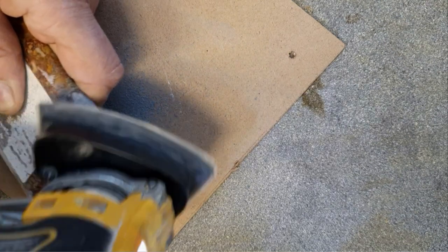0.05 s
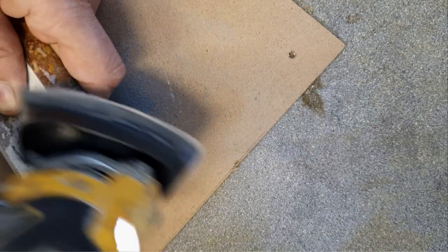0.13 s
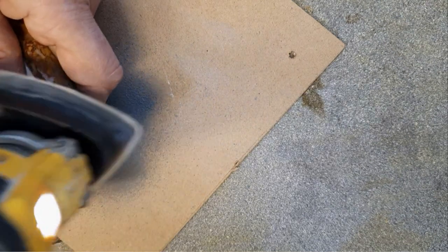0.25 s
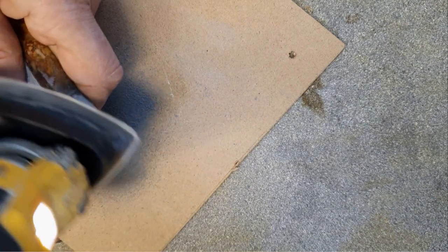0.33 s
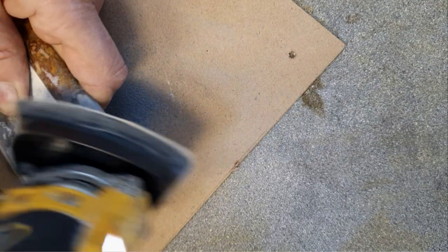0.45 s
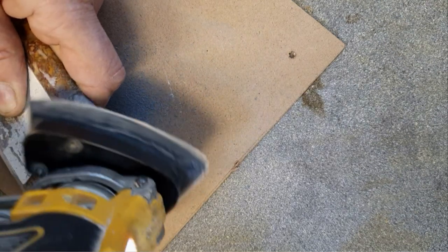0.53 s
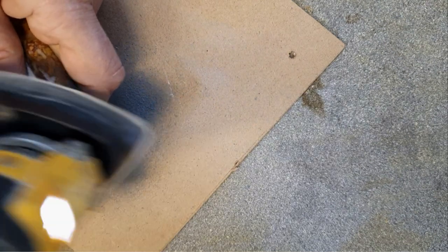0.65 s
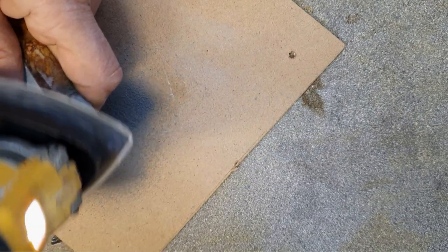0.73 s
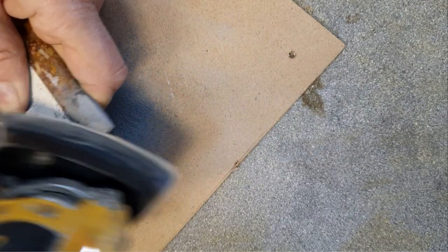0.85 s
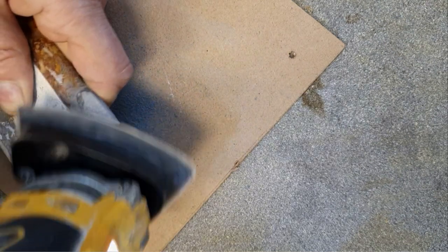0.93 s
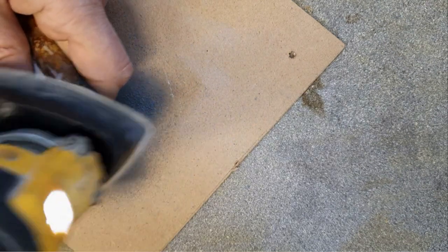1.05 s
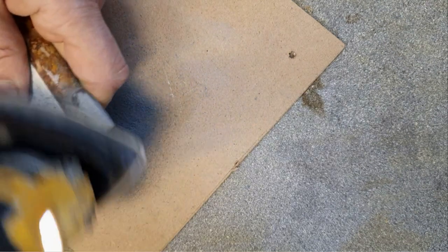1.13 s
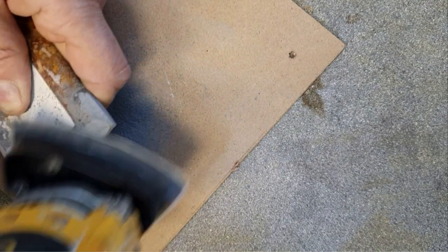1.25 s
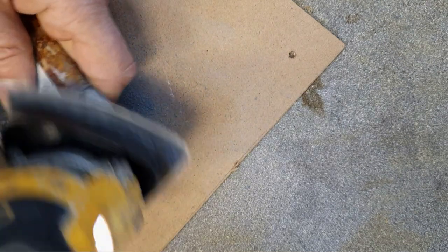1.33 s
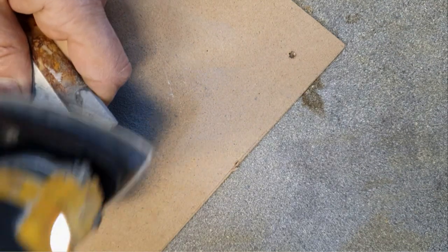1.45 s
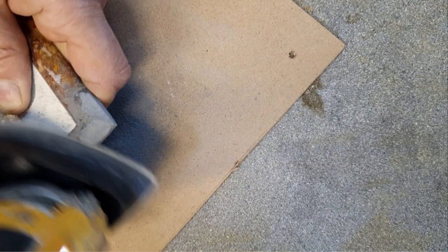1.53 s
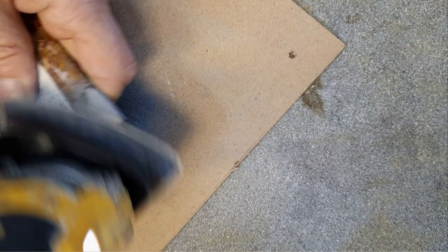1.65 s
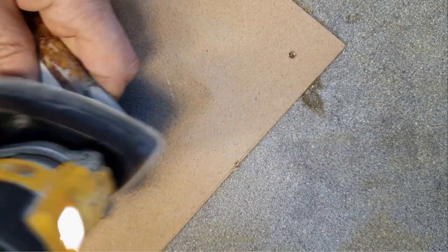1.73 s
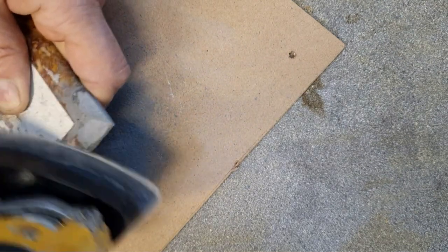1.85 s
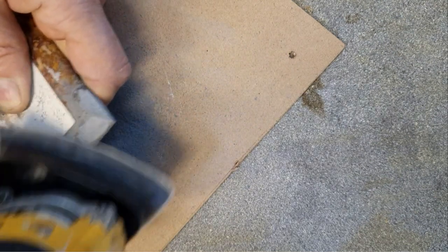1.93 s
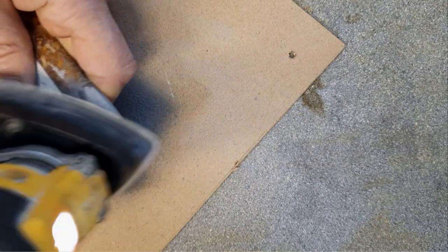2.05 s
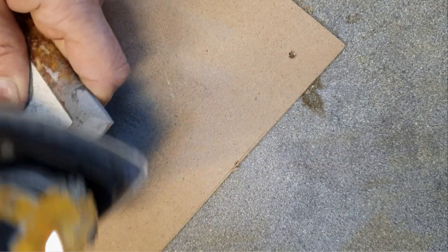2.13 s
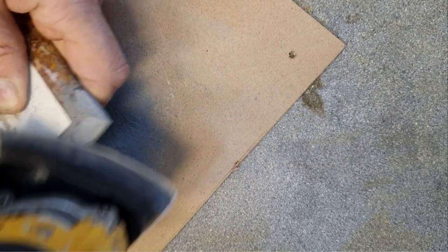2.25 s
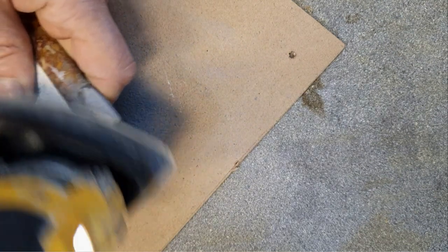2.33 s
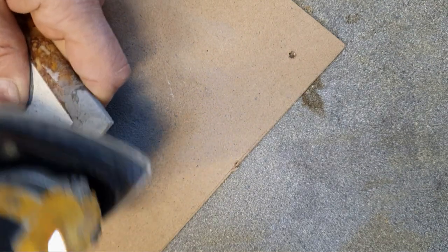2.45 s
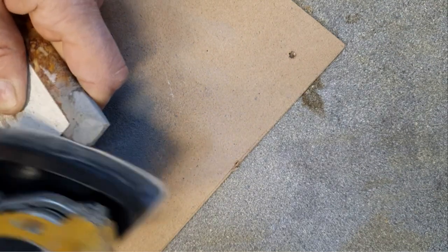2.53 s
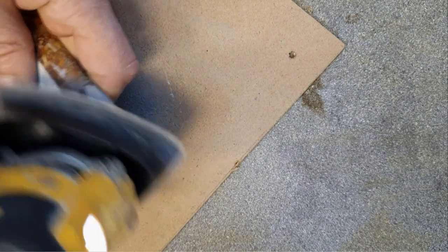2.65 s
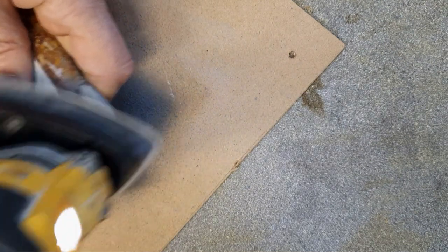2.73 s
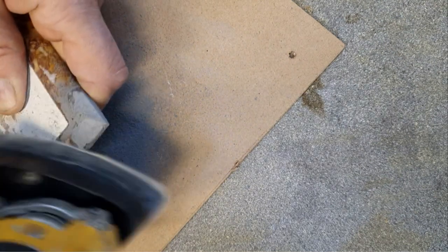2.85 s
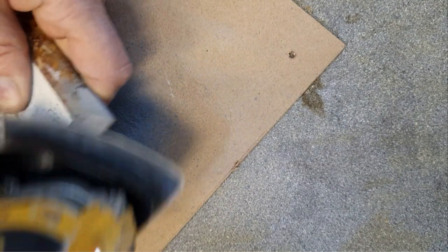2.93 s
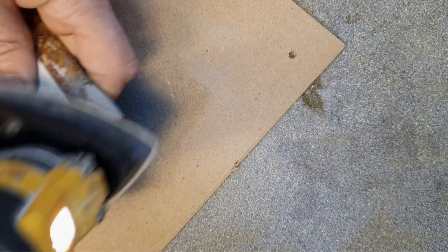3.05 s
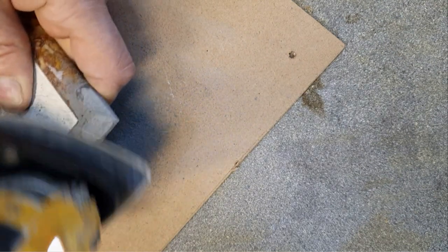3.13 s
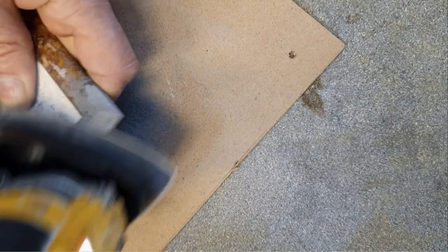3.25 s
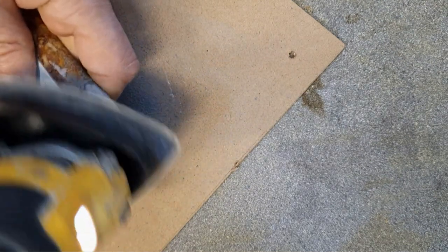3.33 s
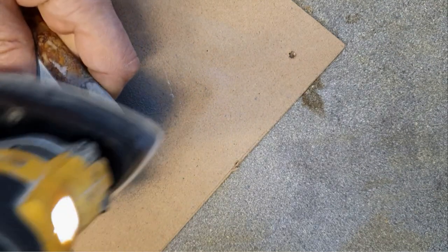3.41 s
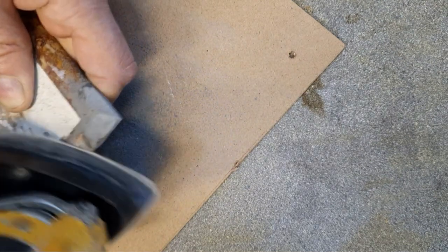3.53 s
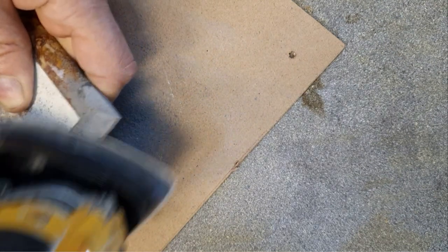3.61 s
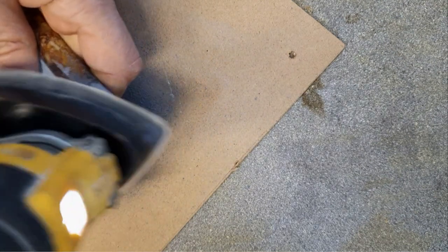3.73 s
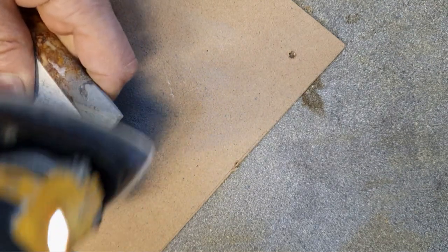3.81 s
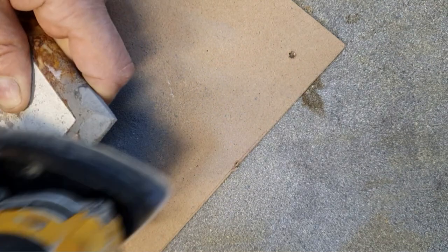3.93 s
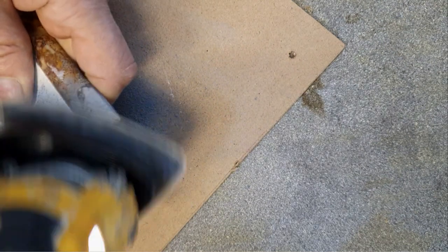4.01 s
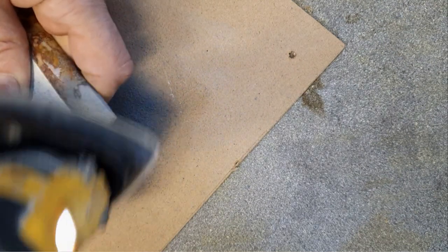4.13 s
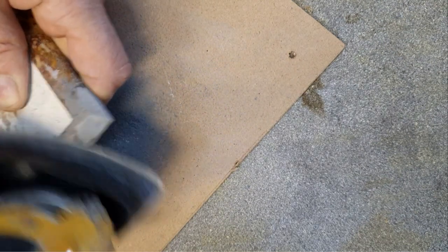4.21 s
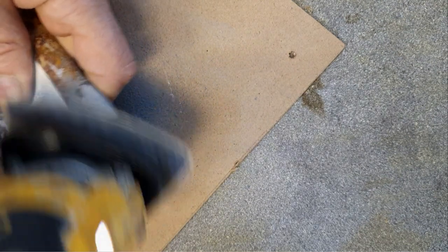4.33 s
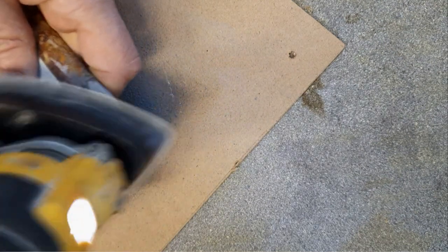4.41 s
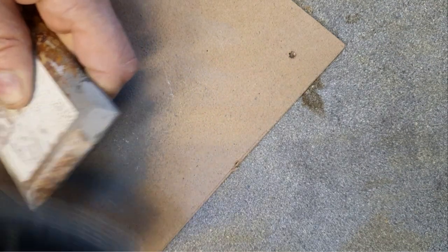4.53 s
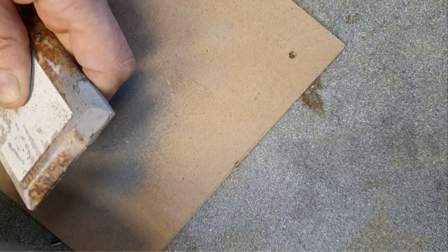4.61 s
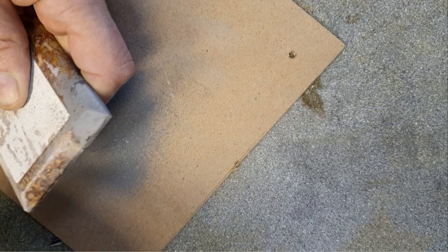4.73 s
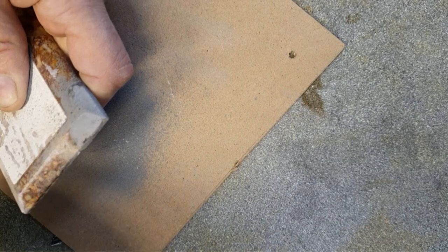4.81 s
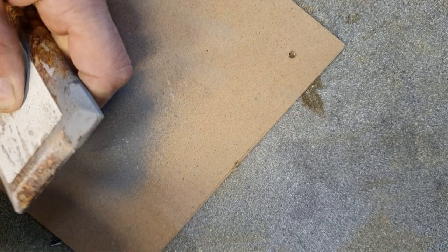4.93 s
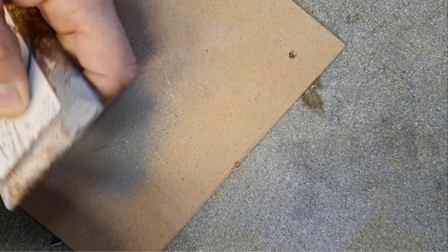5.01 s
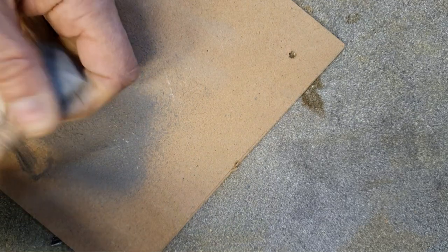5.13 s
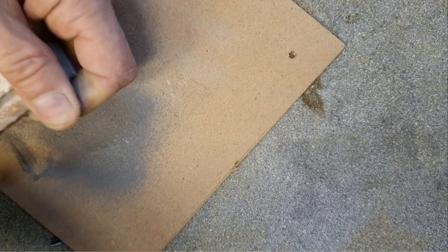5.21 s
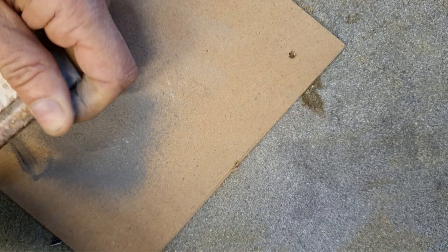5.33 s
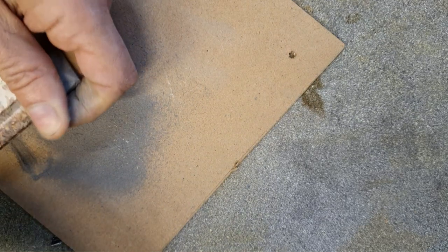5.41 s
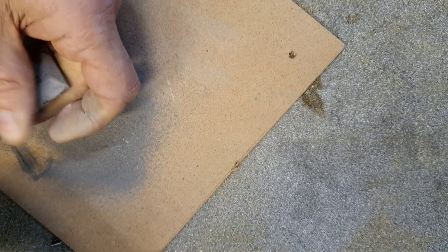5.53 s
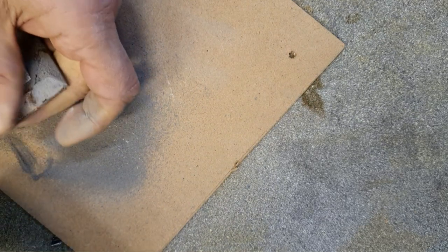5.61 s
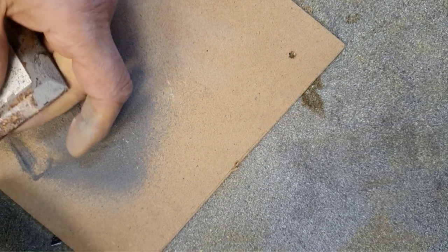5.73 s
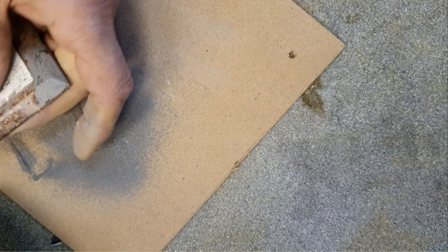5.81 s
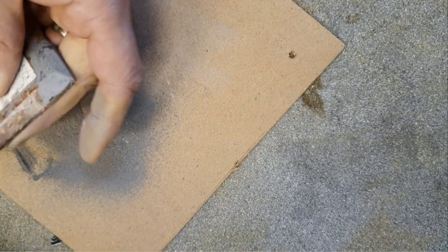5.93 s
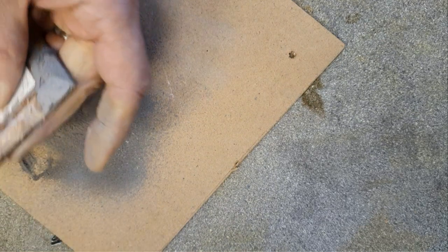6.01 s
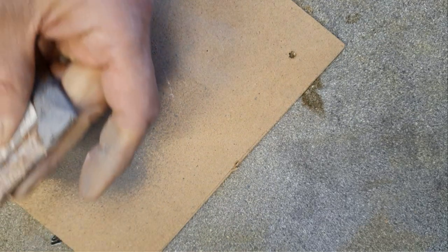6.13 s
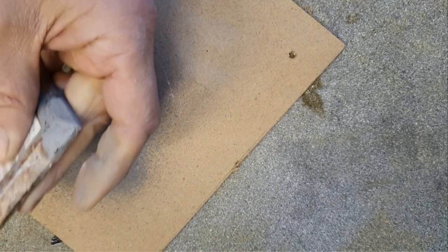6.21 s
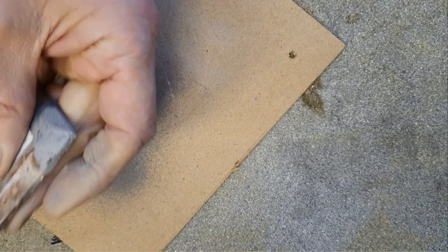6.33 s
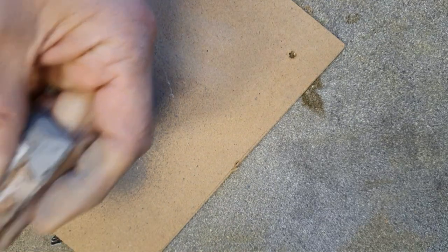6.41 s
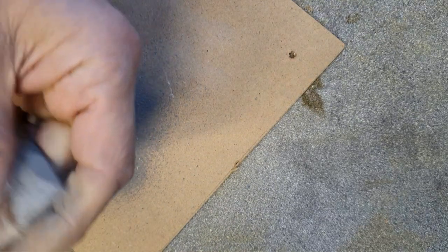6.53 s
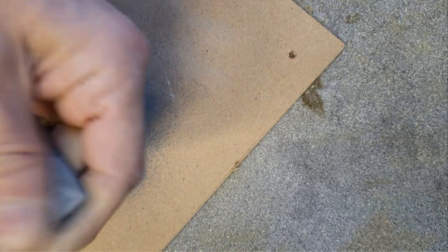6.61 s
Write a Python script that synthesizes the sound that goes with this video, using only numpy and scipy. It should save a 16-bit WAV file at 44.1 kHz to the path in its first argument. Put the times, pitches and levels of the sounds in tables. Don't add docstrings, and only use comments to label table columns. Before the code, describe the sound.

Very close to the microphone in a small dry room, an oscillating sander runs with a coarse, whining buzz and bright gritty hiss, dipping briefly about three times a second as strokes turn. After four and a half seconds it brakes abruptly, leaving a faint ring. A hard block then scrapes in short jerks, knocks twice on the bench, and a fingertip wipes it almost inaudibly.

```python
import sys
import numpy as np
from scipy import signal
from scipy.io import wavfile
from scipy.ndimage import uniform_filter1d

SR = 44100
rng = np.random.default_rng(int(sys.argv[2]) if len(sys.argv) > 2 else 0)


def waveform_to_disk(signal):
    frames = np.transpose(np.atleast_2d(signal))
    scaled = np.clip(frames, -1, 1) * 32767
    samples = np.round(scaled).astype(np.int16)
    wavfile.write(sys.argv[1], SR, samples)


def natural_amplitude(level_db):
    exponent = np.asarray(level_db, float) / 20
    return 10 ** exponent


N = 293688


def evened(x):
    return x / np.sqrt(np.mean(abs(x) ** 2) + 1e-20)


def read(points, hz):
    f, value = np.transpose(points)
    return np.interp(np.log(hz + 1), np.log(f + 1), value)


def follow(table, order):
    return np.interp(order, *np.transpose(table))


def add(mix, s, sound):
    part = mix[round(s * SR):][:len(sound)]
    part += sound[:len(part)]


def filtered(x, order, hz, kind="low"):
    return signal.sosfilt(signal.butter(order, hz, kind, fs=SR, output="sos"), x)


def resonate(x, hz, width):
    return signal.lfilter(*signal.iirpeak(hz, hz / width, SR), x)


def ring(x, modes):
    total = 0
    for k, (hz, width, db) in enumerate(modes):
        mode = resonate(resonate(x, hz, width), hz, 3 * width)
        total = total + (-1) ** k * natural_amplitude(db) * evened(mode)
    return evened(total)


# frequency in Hz, likeness from -1 to 1.
SAME = [(100, 0.53), (1000, -0.057), (4000, 0.31), (8000, 0.14), (13000, -0.32)]


def hiss(spectrum, patchy_db, side=((1, 0), (2, 0))):
    frames, hz = N // 256 + 5, np.fft.rfftfreq(1024, 1 / SR)
    a, b, c, d, patches = rng.standard_normal((frames, 513, 5)).T
    patches = evened(uniform_filter1d(uniform_filter1d(patches, 10, 0), 8, 1))
    same = np.clip(read(SAME, hz), -1, 1)[:, None]
    left, other = a + 1j * b, c + 1j * d
    z = np.array([left, same * left + np.sqrt(1 - same ** 2) * other])
    z *= natural_amplitude(read(spectrum, hz)[:, None] + patchy_db * patches)
    z *= natural_amplitude(np.outer([1, -1], read(side, hz)))[..., None]
    return evened(signal.istft(z, nperseg=1024, noverlap=768)[1][:, :N])


DROP_S, LAND_S, BITE_S = .03, 0.091, 0.0912
LATE_HEEL_S = .11
SETTLE_IN_DB, SETTLE_IN_S = -3, 0.0821
SWING_HZ, BITE_HZ_PER_DB, LIFT_HZ_PER_DB = 214.52, 0.06, 0.07
EDGE_BY_LIFT, GRIT_BY_LIFT, WHINE_BY_LIFT, GRIT_BY_BITE = 0.3, -0.016, 0.012, 0.055
EDGE_BY_LEAN, PRESS_BY_LEAN, WHINE_BY_LEAN, GRIT_BY_LEAN = 0.93, 0.4, .8, .55
# start in seconds, length in seconds, lift in dB,
# edge bite just before in dB, lag of the pad heel in seconds.
TURNS = [(0.211, 0.21, -12, 2.5, 0.047), (0.658, 0.16, -12, 4.5, 0.041), (1.04, 0.12, -9.5, 8, 0.037),
         (1.395, 0.062, -13, 1, 0.072), (1.707, 0.087, -15, 3, 0.0089), (2.07, 0.054, -12, 6.5, 0.0092),
         (2.391, 0.054, -12.5, 5.5, 0.0062), (2.707, 0.088, -5, 5.5, 0.022), (3.009, 0.097, -13, 3, .01),
         (3.364, 0.08, -15, 6.5, 0.009), (3.669, 0.13, -16, 0, 0.014), (4.054, 0.051, -9, 4, 0.0075),
         (4.369, 0.089, -13.5, -0.5, 0.0053)]
# time in seconds, nearness of the tool in dB, tilt onto the pad tip in dB.
LEAN = [(0.02, -24, -29.5), (0.7, -24, -27), (0.76, -25, -33.5), (0.86, -25, -28), (0.98, -22.5, -36),
        (1.21, -26.5, -22), (1.36, -22, -37), (1.44, -22, -23), (1.56, -23, -27), (3.359, -22.5, -29.5),
        (3.4, -19.5, -41.5), (3.48, -22, -23.5), (3.81, -20.5, -30.5), (3.851, -23, -24),
        (4.45, -21.5, -32.5), (4.48, -22.5, -21.5), (4.54, -20.5, -31), (4.6, -19.5, -28)]


def handling(t):
    at, length, lift_db, bite_db, lag = np.transpose(TURNS)[:, :, None]
    down = (t - at) / DROP_S
    lifted = np.clip(down, 0, 1)
    up = np.clip((at + length - t) / LAND_S + .5, 0, 1)
    landed = np.maximum(t - at - length, 0)
    toe = (lift_db * lifted * up).sum(0)
    toe = toe + (SETTLE_IN_DB * np.exp(-landed / SETTLE_IN_S) * lifted).sum(0)
    heel_down = np.clip((t - at - lag / 2) / (DROP_S + lag), 0, 1)
    heel_up = np.clip((at + np.maximum(length, lag + LAND_S) - t) / LAND_S + .5, 0, 1)
    heel = (lift_db * (1.1 - lag / LATE_HEEL_S) * heel_down * heel_up).sum(0)
    bite = (bite_db * np.exp(np.minimum(t - at, 0) / BITE_S) * np.clip(1 - down, 0, 1)).sum(0)
    s, *grip = np.transpose(LEAN)
    lean, tilt = (np.interp(t, s, c - np.median(c)) for c in grip)
    hz = SWING_HZ + BITE_HZ_PER_DB * bite + LIFT_HZ_PER_DB * toe
    edge = bite - np.median(bite) + EDGE_BY_LIFT * toe + EDGE_BY_LEAN * lean
    grit = GRIT_BY_LIFT * toe + GRIT_BY_BITE * bite + GRIT_BY_LEAN * lean
    whine = WHINE_BY_LIFT * toe + WHINE_BY_LEAN * lean
    return hz, toe + PRESS_BY_LEAN * lean, heel + PRESS_BY_LEAN * lean, edge, whine, grit, tilt


# order, left level in dB, right level in dB, # left lead in radians,
# unsteady share 0-1.
SWING_ORDERS = [(1, -42.3, -32.0, -0.84, 0.15), (2, -36.2, -25.8, 2.43, 0.48),
                (3, -33.9, -37.4, 0.39, 0.25), (4, -22.7, -27.0, 0.98, 0.35), (5, -30.2, -36.7, 0.11, 0.89),
                (6, -22.9, -22.7, -0.07, 0.27), (7, -30.7, -24.3, 0.36, 0.3), (8, -28.7, -29.3, 1.54, 0.55),
                (9, -27.9, -34.3, 0.35, 0.43), (10, -30.9, -38.5, -2.32, 0.72),
                (11, -34.6, -38.3, 0.23, 0.69), (12, -47.0, -41.0, -2.92, 0.81),
                (13, -37.9, -33.2, -2.72, 0.49), (14, -37.4, -41.0, -1.18, 0.59),
                (15, -31.0, -33.8, 0.08, 0.68), (16, -21.0, -24.9, 1.75, 0.17),
                (17, -28.6, -32.5, 1.88, 0.53), (18, -34.2, -38.2, -0.27, 0.82),
                (19, -30.9, -36.4, 1.33, 0.89), (20, -34.3, -40.0, -1.92, 0.47),
                (21, -37.8, -38.9, -2.37, 0.62), (22, -42.1, -43.4, 2.27, 0.66),
                (23, -39.5, -41.6, 1.84, 0.5), (24, -39.7, -49.0, 1.91, 0.56),
                (25, -38.0, -52.6, -1.37, 0.83), (26, -38.0, -50.7, 2.45, 0.82),
                (27, -45.6, -44.9, -0.87, 0.77), (28, -41.6, -45.5, -0.18, 0.34),
                (29, -40.9, -47.3, 0.06, 0.57), (30, -46.2, -50.2, -1.2, 0.82),
                (31, -38.6, -45.7, -0.85, 0.63), (32, -42.7, -53.5, -2.29, 0.8),
                (33, -40.7, -42.8, -1.47, 0.48), (34, -51.2, -47.3, 2.88, 0.78),
                (35, -47.0, -48.6, -1.08, 0.65), (36, -46.1, -50.2, -2.31, 0.63),
                (37, -46.0, -53.5, -0.24, 0.9), (38, -47.2, -59.5, 0.39, 0.61),
                (39, -45.3, -62.4, -0.91, 0.1), (40, -46.9, -54.4, 1.64, 0.89),
                (41, -46.2, -58.7, 1.19, 0.48), (42, -52.0, -52.9, -1.42, 0.78),
                (43, -53.4, -53.4, 2.63, 0.9), (44, -55.3, -52.3, -0.23, 0.87)]
UPPER_DB = 4
# order, response in dB per dB.
BY_PRESS = [(1, 0), (2, .45), (3, .25), (4, 1.), (5, .5), (6, 0)]
BY_HEEL = [(5, 0), (6, 1.), (7, 0)]
BY_TILT = [(7, 0), (8, .8), (9, .8), (11, .4), (13, 0)]
BY_EDGE = [(6, 0), (7, 1.), (8, .35), (11, .3), (13, 0)]
BY_WHINE = [(14, 0), (15, .5), (16, 1.15), (17, .2), (20, 0)]
BY_NULL = [(3, 0), (4, 1.), (5, 0)]
# time in seconds, order, swell in dB (negative sinks),
# half length in seconds.
FLARES = [(.125, 20, 9, .08), (.56, 20, 11, .06), (.98, 20, 8, .045), (1.35, 20, 6, .05), (4.6, 20, 7, .03),
          (4.6, 8, 8, .035), (4.6, 9, -4, .035), (4.57, 16, -8, .025), (.45, 7, 5, .035),
          (4.25, 16, -4, .06)]
# time in seconds, order, swell in dB (negative sinks), # half
# length in seconds.
ORDER_SWELLS = [(0.179, 8, 4.0, 0.08), (0.224, 5, -4.7, 0.08), (0.268, 9, -5.7, 0.13), (0.478, 7, 2.7, 0.13),
                (0.512, 17, 4.0, 0.08), (0.649, 9, -3.4, 0.13), (0.66, 8, 6.6, 0.05), (0.8, 19, 6.5, 0.08),
                (1.034, 8, 6.3, 0.08), (1.12, 19, 5.1, 0.13), (1.259, 8, -6.6, 0.05), (1.458, 15, -4.4, 0.08),
                (1.58, 19, 3.6, 0.13), (1.599, 5, -4.3, 0.13), (1.655, 8, -6.2, 0.05), (1.918, 5, -7.6, 0.08),
                (2.19, 5, -6.1, 0.05), (2.467, 15, -3.2, 0.13), (2.478, 20, -4.1, 0.13), (2.755, 5, 7.6, 0.03),
                (2.764, 15, -4.9, 0.08), (2.884, 8, -2.7, 0.13), (2.9, 17, -3.8, 0.13), (2.923, 20, -4.0, 0.13),
                (2.932, 19, -4.3, 0.13), (2.943, 5, 5.7, 0.05), (3.206, 5, -7.6, 0.05), (3.492, 8, 4.1, 0.08),
                (3.601, 15, 5.2, 0.05), (3.782, 19, 5.4, 0.08), (3.807, 5, 5.5, 0.08), (3.943, 15, 5.3, 0.08),
                (4.048, 6, 2.6, 0.13), (4.161, 5, 5.0, 0.05), (4.361, 19, -6.0, 0.05),
                (0.1, 17, 6.3, 0.05), (0.11, 19, 7.7, 0.09), (0.12, 22, 5.9, 0.09), (0.14, 4, -4.8, 0.09),
         (0.16, 7, 3.1, 0.09), (0.18, 20, 8.3, 0.05), (0.3, 10, 4.5, 0.09), (0.3, 16, -4.6, 0.09),
         (0.32, 17, -4.9, 0.05), (0.34, 4, 4.9, 0.09), (0.54, 10, -7.1, 0.09), (0.58, 8, -3.9, 0.09),
         (0.61, 4, -3.7, 0.05), (0.71, 10, 7.5, 0.05), (0.73, 16, -3.0, 0.09), (0.8, 4, 5.9, 0.09),
         (0.81, 19, -9.6, 0.05), (0.95, 5, -4.5, 0.15), (1.36, 4, -4.3, 0.05), (1.38, 19, 6.9, 0.09),
         (1.45, 16, -2.3, 0.09), (1.58, 10, -4.6, 0.09), (2.01, 5, 6.1, 0.09), (2.09, 8, -3.1, 0.09),
         (2.09, 15, -5.5, 0.05), (2.3, 9, 3.8, 0.09), (2.49, 16, -2.7, 0.09), (2.82, 16, -3.1, 0.05),
         (3.07, 4, 6.8, 0.05), (3.17, 21, -9.4, 0.05), (3.21, 8, 4.4, 0.09), (3.26, 10, 6.5, 0.05),
         (3.41, 16, -5.5, 0.05), (3.46, 6, 4.0, 0.05), (3.55, 8, -4.2, 0.09), (3.61, 9, 4.5, 0.05),
         (3.74, 4, 8.0, 0.05), (3.78, 16, -3.0, 0.09), (3.85, 5, -4.8, 0.05), (3.98, 19, -5.4, 0.09),
         (4.02, 5, 4.3, 0.09), (4.02, 17, 4.8, 0.09), (4.11, 16, -3.2, 0.05), (4.13, 6, 3.9, 0.05),
         (4.19, 7, -4.1, 0.05), (4.34, 15, 4.2, 0.09), (4.36, 7, 3.1, 0.09), (4.41, 17, 2.4, 0.15),
         (4.47, 16, -2.0, 0.15)]
NULL_DB, NULL_S = -14, .012
WANDER_RAD = .15
STRONG_PORT, WEAK_PORT = .45, 1.25
SWEEP_RAD, UPPER_SWEEP_RAD = .13, .03
BRAKE_POWER, HIGH_POWER = 3.4, 1.2


def swing_tones(t, swing, speed, press_db, heel_db, edge_db, whine_db, tilt_db):
    slow = slice(None, None, 64)
    ts = t[slow]
    out = np.zeros((2, len(t)))
    null_db = sum(NULL_DB * np.exp(-((ts - row[0] - DROP_S) / NULL_S) ** 2) for row in TURNS)
    controls = [(BY_PRESS, press_db), (BY_HEEL, heel_db), (BY_TILT, tilt_db), (BY_EDGE, edge_db),
                (BY_WHINE, whine_db), (BY_NULL, null_db)]
    for k, left_db, right_db, lead, share in SWING_ORDERS:
        k = round(k)
        level_db = np.array([[left_db], [right_db]]) + UPPER_DB * (k > 20)
        sweep = SWEEP_RAD if k < 14 else UPPER_SWEEP_RAD
        start = (np.pi / 2 - sweep) * k ** 2 + .45 * rng.standard_normal()
        start = start * (k < 14 or k > 18)
        share = np.minimum(share * np.where(level_db == level_db.max(), STRONG_PORT, WEAK_PORT), .95)
        drift = rng.standard_normal((2, 2, len(ts)))
        drift = uniform_filter1d(uniform_filter1d(drift, size=45), size=25)
        wander = uniform_filter1d(uniform_filter1d(rng.standard_normal(len(ts)), 150), 150)
        wander = WANDER_RAD * (1 < k < 14) * evened(wander)
        phase = start + np.array([[0], [-1]]) * (lead + wander)
        steady = np.sqrt(1 - share ** 2) * np.exp(1j * phase)
        size = steady + share * evened(drift[0] + 1j * drift[1])
        follow_db = sum(follow(table, k) * control for table, control in controls)
        for at, which, db, half in FLARES + ORDER_SWELLS:
            if round(which) == k:
                follow_db = follow_db + db * np.exp(-((ts - at) / half) ** 4)
        size = size * natural_amplitude(level_db + follow_db) * speed[slow] ** (BRAKE_POWER + HIGH_POWER * k)
        size = np.array([np.interp(t, ts, port) for port in size])
        out += np.sqrt(2) * (size * np.exp(1j * k * swing)).real
    return out


# frequency in Hz, level in dB per Hz.
GRIT = [(30, -22.5), (100, -21.5), (200, -15.5), (310, -21.5), (500, -11), (1000, -5.5), (2000, -1),
        (2600, -2.5), (3500, -1.5), (6000, -4.5), (7200, -7.5), (9000, -4.5), (12000, -10.5), (14500, -12),
        (15800, -14)]
# frequency in Hz, level toward the left in dB.
GRIT_SIDE = [(300, -0.5), (1000, 2.5), (3000, 1), (8000, 0.9), (14000, -1.4)]
GRIT_DB, CHATTER_DB = -24.5, -57.5


def grit_scour(t, swing, press_db, edge_db, grit_db):
    grit = hiss(GRIT, patchy_db=2.5, side=GRIT_SIDE)[:, :len(t)]
    dull = filtered(grit, 2, 1300)
    grit = grit + dull * (natural_amplitude(0.78 * press_db) - 1)
    puffs = 1 + 0.36 * np.cos(2 * swing)
    chatter = evened(resonate(resonate(grit, 2100, 1600), 2100, 1600))
    chatter = chatter * natural_amplitude(CHATTER_DB - 0.074 * press_db + 1.4 * edge_db)
    return grit * puffs * natural_amplitude(GRIT_DB + grit_db) + chatter, dull


BRAKE_S, BRAKE_TAU = 4.615, .047
SCRUB_S = .047
RUSTLE_DB, RUSTLE_T60, RUSTLE_HZ, RUSTLE_LOW_DB = 2.5, .26, 9000, 9


def sander():
    t = np.arange(round(4.9 * SR)) / SR
    controls = handling(t[::64])
    hz, press_db, heel_db, edge_db, whine_db, grit_db, tilt_db = controls
    full_hz, full_press, full_edge, full_grit = (
        np.interp(t, t[::64], c) for c in (hz, press_db, edge_db, grit_db))
    after = np.maximum(t - BRAKE_S, 0)
    speed = np.exp(-(after / BRAKE_TAU) ** 2 / 2)
    swing = 2 * np.pi * np.cumsum(full_hz * speed) / SR
    tones = swing_tones(t, swing, speed, press_db, heel_db, edge_db, whine_db, tilt_db)
    scour, dull = grit_scour(t, swing, full_press, full_edge, full_grit)
    running = np.exp(-(after / SCRUB_S) ** 4)
    dying = (1 - running) * natural_amplitude(RUSTLE_DB - 60 * after / RUSTLE_T60) * np.clip((4.9 - t) / 0.05, 0, 1)
    rustle = (scour + dull * natural_amplitude(GRIT_DB + RUSTLE_LOW_DB))[:, ::-1]
    rustle = signal.lfilter(*signal.butter(2, RUSTLE_HZ, fs=SR), rustle)
    out = np.zeros((2, N))
    out[:, :len(t)] = tones + scour * running + dying * rustle
    return out


# frequency in Hz, time to fall 60 dB in seconds.
ROOM = [(100, .15), (1000, .2), (4000, .2), (12000, .12)]


def room(x):
    taps = np.zeros((2, SR // 2))
    at = np.arange(200, SR // 2 - 20, 20) + rng.integers(0, 20, (2, (SR // 2 - 201) // 20))
    np.put_along_axis(taps, at, rng.choice([-1., 1.], at.shape), 1)
    hz, t, z = signal.stft(taps, SR, nperseg=256)
    tail = signal.istft(z * natural_amplitude(-60 * t / read(ROOM, hz)[:, None]), SR, nperseg=256)[1]
    return signal.fftconvolve(x, tail / np.linalg.norm(tail[0]), axes=1)[:, :N]


# frequency in Hz, level in dB per Hz.
AIR = [(30, -17), (60, -0.5), (108, -6), (455, -26), (1050, -26), (6500, -43.5), (8500, -32.5),
       (15500, -45)]


def air():
    return natural_amplitude(-72) * hiss(AIR, patchy_db=1.0)


# frequency in Hz, level in dB, time to fall 60 dB in seconds.
BENCH_RING = [(850, -60, .5), (1058, -61, .55)]


def bench_ring():
    t, out = np.arange(SR // 2) / SR, np.zeros(N)
    for hz, db, t60 in BENCH_RING:
        tone = natural_amplitude(db - 60 * t / t60) * np.sin(2 * np.pi * hz * t)
        add(out, 4.72, tone * np.minimum(t / 0.051, 1))
    return out


def rumble(count):
    noise = filtered(rng.standard_normal(count + SR // 4), 4, 55, "high")
    shake = resonate(noise, 85.0, 30) + 0.93 * resonate(noise, 71.1, 37) + 0.11 * resonate(noise, 130, 72)
    return evened(resonate(shake, 108, 170)[-count:])


# start in seconds, length in seconds, scrape at start in dB,
# scrape at end in dB, ring of the metal edge over the scrape in dB.
DRAGS = [
    (5.058, 0.057, -96.5, -89, 12),
    (5.115, 0.045, -36, -45, 3.5),
    (5.183, 0.028, -40, -37.5, -9),
    (5.402, 0.035, -66, -68, -18),
    (5.43, 0.073, -73, -54, -22),
    (5.504, 0.047, -46.5, -51, -15),
    (5.8, .055, -92, -72, -8),
    (5.858, 0.059, -39.5, -43, -14),
    (5.923, 0.154, -42, -31, -10),
    (6.094, 0.089, -40, -42, -6.5),
]
# frequency in Hz, width in Hz, level in dB.
BLOCK = [(254, 140, -8), (416, 80, -2), (569, 77, -6.5), (826, 125, -2), (1290, 230, -6.5),
         (1700, 170, -10), (2020, 200, -7), (2750, 550, -7.5), (3720, 120, -16), (3960, 200, -19),
         (4750, 360, -37), (6970, 170, -36)]
# frequency in Hz, width in Hz, level in dB.
EDGE = [(3213, 84, 8), (2960, 39, -5)]
GRAINS_PER_S = 3500
GRIP_S, RELEASE_DB_PER_S, RELEASE_S = 0.0031, 327, .2
EDGE_STEEP, RUMBLE_DB, RUMBLE_SHARE = 0.26, -6, 1
LINGER_DB, LINGER_DB_PER_S = -31, 132
BRIGHT_PER_DB, HARD_DB = 0.5, -32
DUST_DB, DUST_SHARE = -34.5, .65


def drag(start, length, from_db, to_db, edge_db):
    t, count = np.arange(0, length + RELEASE_S, 1 / SR), SR // 2
    scrape_db = from_db + (to_db - from_db) * np.minimum(t / length, 1)
    scrape_db = scrape_db - RELEASE_DB_PER_S * np.maximum(t - length, 0)
    linger = natural_amplitude(to_db + edge_db + LINGER_DB - LINGER_DB_PER_S * abs(t - length))
    edge_db = scrape_db + edge_db + EDGE_STEEP * (scrape_db - scrape_db.max())
    clicks = natural_amplitude(4.6 * np.minimum(rng.exponential(1, count), 3))
    clicks = clicks * np.sign(rng.random(count) - .5) * (rng.random(count) < GRAINS_PER_S / SR)
    dust = rng.standard_normal(count) + evened(clicks)
    dust = evened(resonate(resonate(dust, 9500, 7000), 9500, 7000))[:len(t)]
    low = ring(clicks, BLOCK[:5])[:len(t)]
    body = ring(clicks, BLOCK)[:len(t)]
    edge = ring(clicks, EDGE)[:len(t)]
    shake = rumble(count)[:len(t)]
    bright = natural_amplitude(BRIGHT_PER_DB * min(max(from_db, to_db) - HARD_DB, 0))
    sound = natural_amplitude(scrape_db) * (bright * body + (1 - bright) * low)
    sound = sound + (natural_amplitude(edge_db + 5.0) + linger) * edge
    sound = sound + natural_amplitude(RUMBLE_DB + RUMBLE_SHARE * scrape_db) * shake
    sound = sound + natural_amplitude(HARD_DB + DUST_DB + DUST_SHARE * (scrape_db - HARD_DB)) * dust
    return start, sound * np.minimum(t / GRIP_S, 1) * np.minimum((t[-1] - t) / .02, 1)


# time in seconds, peak in dB, sharpness (1 is sharpest).
SLIPS = [(5.117, -15.5, 1.0), (5.131, -16, 0.95), (5.142, -24, 0.81), (5.151, -21, 0.79),
         (5.16, -19.5, 0.86), (5.172, -33, 0.55), (5.183, -26, 0.79), (5.194, -37, 0.8), (5.216, -29, 0.83),
         (5.404, -50, 0.65), (5.461, -61, 0.54), (5.48, -55, 0.45), (5.505, -37, 0.54), (5.521, -45, 0.43),
         (5.922, -24, 0.72), (5.948, -30, 0.73), (5.96, -30, .8), (6.004, -24, .7), (6.037, -24, 0.8),
         (6.053, -25.5, 1), (6.081, -19.5, 0.56), (6.119, -29, 0.69), (6.149, -35, 0.81), (6.2, -34, 0.69)]
TICK_DB = -21


def slip(db, sharp):
    u = (np.arange(1500) / SR - .0018) * sharp / 0.00017
    pull = -(1 - u ** 2) * np.exp(-u ** 2 / 2)
    tip = -natural_amplitude(TICK_DB) * (1 - 9 * u ** 2) * np.exp(-9 * u ** 2 / 2)
    jolt = pull + tip
    ringing = sum(natural_amplitude(d) * resonate(jolt, hz, width) for hz, width, d in BLOCK + EDGE)
    return natural_amplitude(db) * (0.42 * jolt + 1.94 * ringing)


# frequency in Hz, level in dB, time to fall 60 dB in seconds.
BENCH = [
    [(85, -28, .4), (107.4, -5.3, .086), (232, 4.6, .02), (342, -26, .1), (512, -22, .03)],
    [(71.6, -14.6, .22), (95.3, 0, .054), (143.4, -8.8, .08), (212, -19, .093), (352, 3.1, .02),
     (534, -13, .02)],
]
# time in seconds, blow in dB, direction (1 or -1), spot number.
BOUNCES = [
    (5.8696, -3, -1, 0),
    (6.084, 1.2, -1, 1),
]
BLOW_S = .004


def thud(db, way, spot):
    t = np.arange(SR // 2) / SR
    modes = sum(natural_amplitude(d - 60 * t / t60) * np.sin(2 * np.pi * hz * t) for hz, d, t60 in BENCH[round(spot)])
    return natural_amplitude(db) * np.sign(way) * modes * (1 - np.exp(-t / BLOW_S)) ** 2


# time in seconds, blow in dB, direction (1 or -1), spot number, crack in dB.
KNOCKS = [
    (5.858, -3.3, -1, 0, -53.5),
    (6.0774, -6.8, 1, 1, -55),
    (6.0809, -2.7, 1, 1, -50.5),
]
CRACK_HZ = [8000, 14000]
CRACK_LAG_S = .003
SHAKE_DB, SHAKE_DB_PER_S = -23, 123


def knock(db, way, spot, crack_db):
    t = np.arange(SR // 2) / SR
    noise = filtered(rng.standard_normal(len(t)), 4, CRACK_HZ[round(spot)])
    crack = natural_amplitude(12.5 + crack_db - 60 * t / 0.049) * noise * (t > CRACK_LAG_S)
    shake = natural_amplitude(db + SHAKE_DB - SHAKE_DB_PER_S * t) * rumble(len(t)) * (1 - np.exp(-t / BLOW_S)) ** 2
    return thud(db, way, spot) + shake + crack


# time in seconds, finger pressure in dB.
RUB = [
    (6.3, -96),
    (6.434, -103.5),
    (6.478, -80.5),
    (6.554, -64),
    (6.586, -64),
    (6.66, -55.5),
]
# frequency in Hz, level in dB per Hz.
SKIN = [(500, -9), (1500, -12), (2200, -17), (3100, -3), (4800, -12.5), (8000, -8), (12000, -8),
        (15500, -18)]
# start in seconds, level in dB, pitch in Hz, length in seconds.
SQUEAKS = [
    (6.45, -80, 1570, .15),
    (6.48, -77, 3750, .045),
    (6.62, -57, 1370, .028),
]
SETTLE_DB, SETTLE_DB_PER_S = -61.5, 11


def rub():
    t, (s, rub_db) = np.arange(N) / SR, np.transpose(RUB)
    on = np.clip((t - s[0]) / 0.044, 0, 1)
    wipe = natural_amplitude(np.interp(t, s, rub_db)) * hiss(SKIN, patchy_db=4.5)
    settle = natural_amplitude(SETTLE_DB - SETTLE_DB_PER_S * np.maximum(t - s[0], 0)) * rumble(N)
    out = on * (wipe + settle)
    for at, db, hz, length in SQUEAKS:
        swell = np.sin(np.pi * np.clip((t - at) / length, 0, 1)) ** 2
        out = out + natural_amplitude(db) * np.sin(2 * np.pi * hz * t) * swell
    return out


PORT_LAG = 6


def scene():
    tool = sander()
    block = bench_ring()
    for row in DRAGS:
        add(block, *drag(*row))
    for s, db, sharp in SLIPS:
        add(block, s, slip(db, sharp))
    for s, *blow in KNOCKS:
        add(block, s, knock(*blow))
    for s, *blow in BOUNCES:
        add(block, s, thud(*blow))
    lows = signal.sosfiltfilt(signal.butter(2, 400, fs=SR, output="sos"), block)
    highs = signal.sosfiltfilt(signal.butter(4, 3400, "high", fs=SR, output="sos"), block)
    middle = block - lows - highs
    upper = highs + np.array([np.roll(middle, PORT_LAG), middle])
    block = lows * natural_amplitude([[-.4], [.4]]) + upper * natural_amplitude([[1.3], [-1.3]])
    tool_room = natural_amplitude(-25) * room(tool)
    block_room = natural_amplitude(-17) * room(block - .7 * lows)
    return tool + tool_room + block + block_room + rub() + air()


def low_pass(x):
    return signal.sosfilt(signal.butter(12, 15730, fs=SR, output="sos"), x)


CEILING, BASS_CUT_HZ = .85, 41


def record(dry):
    cut = filtered(dry, 2, BASS_CUT_HZ, "high")
    held = cut / (1 + (cut / CEILING) ** 4) ** .25
    return low_pass(held)


dry = scene()
out = record(dry)
waveform_to_disk(out)
```